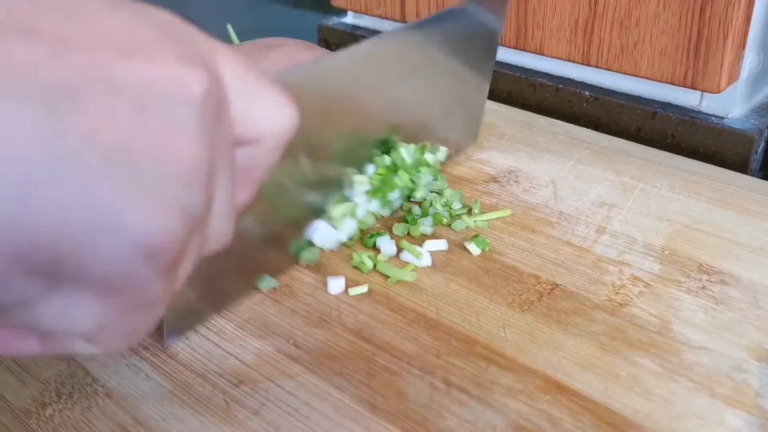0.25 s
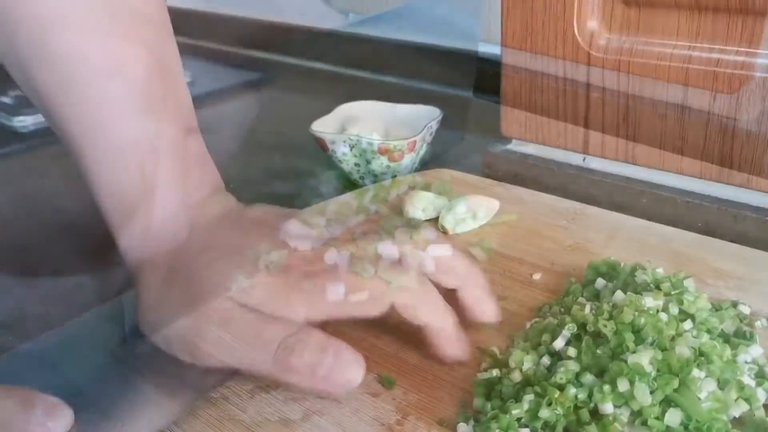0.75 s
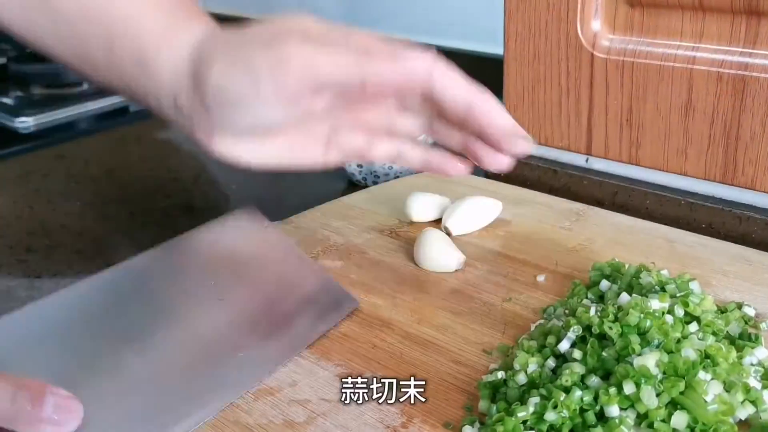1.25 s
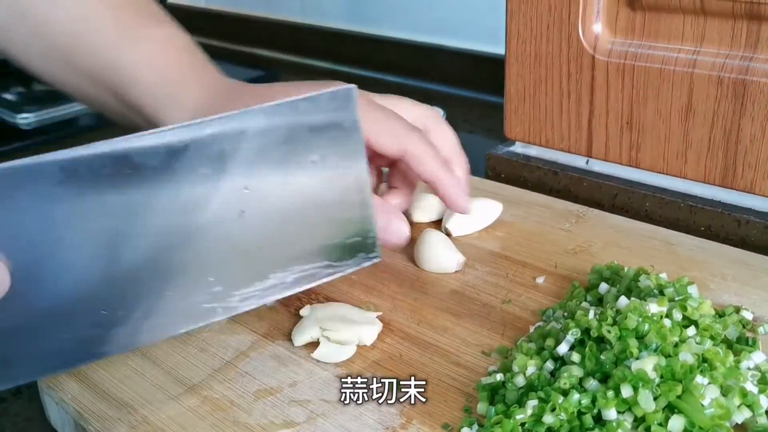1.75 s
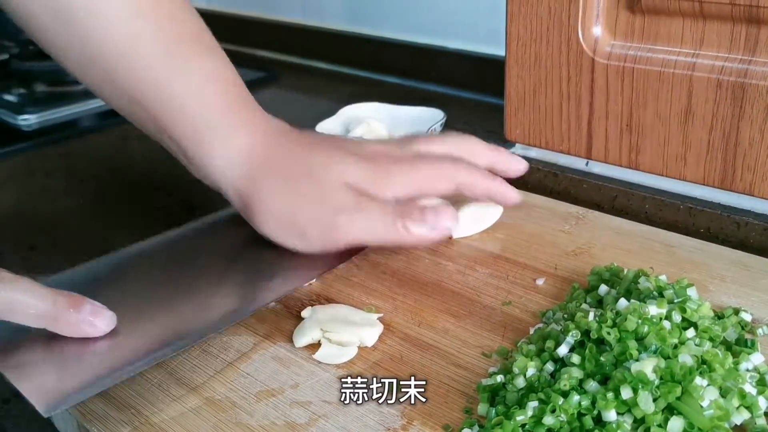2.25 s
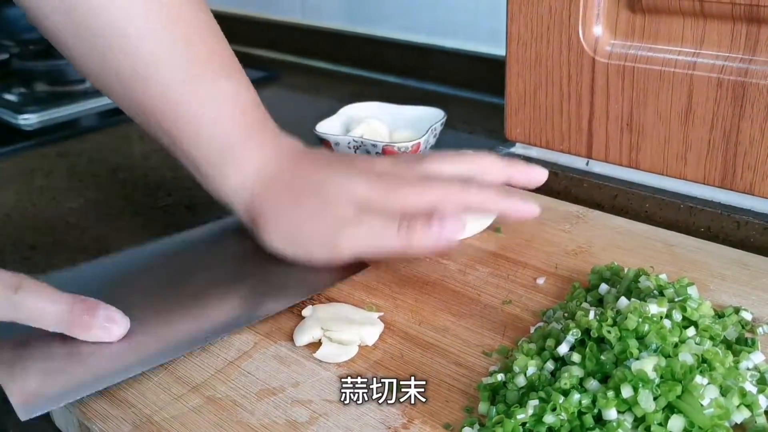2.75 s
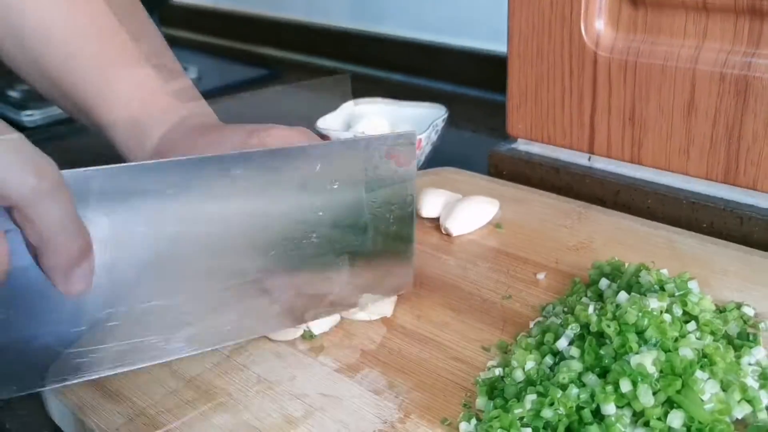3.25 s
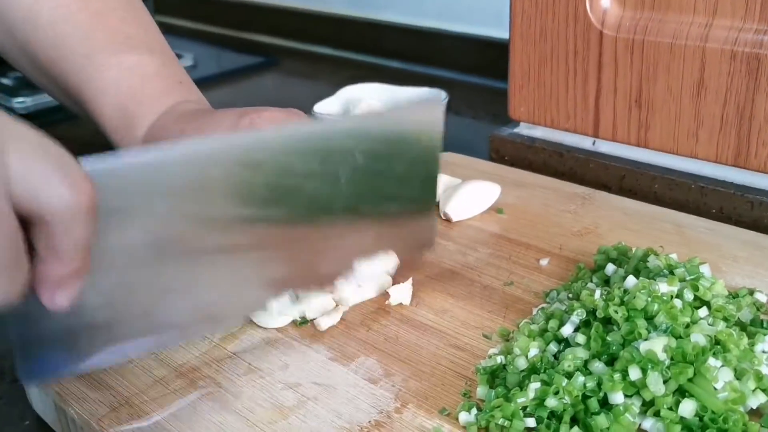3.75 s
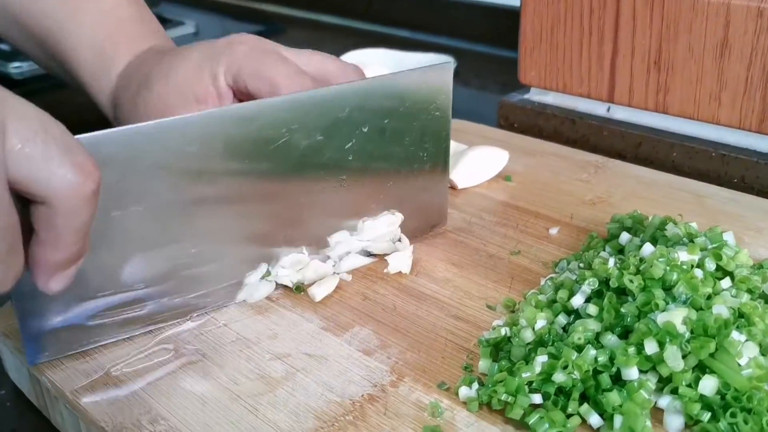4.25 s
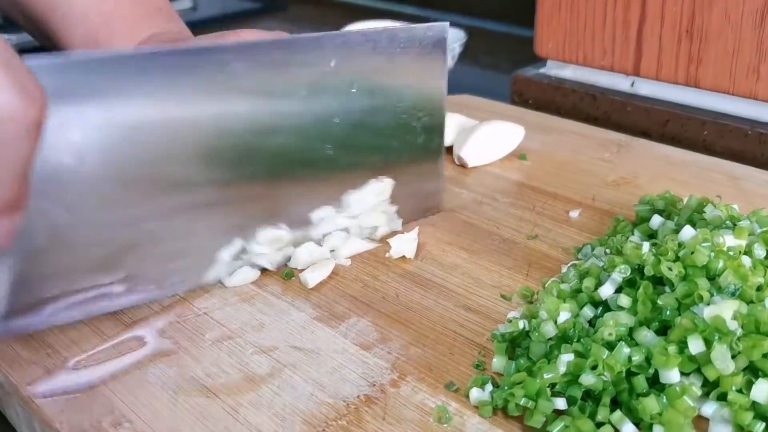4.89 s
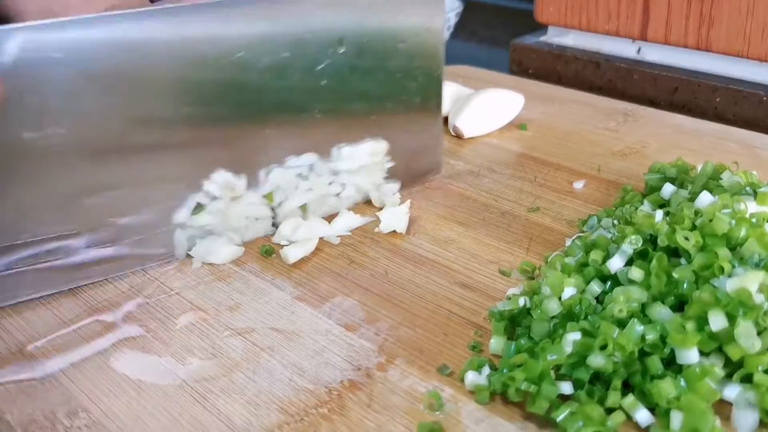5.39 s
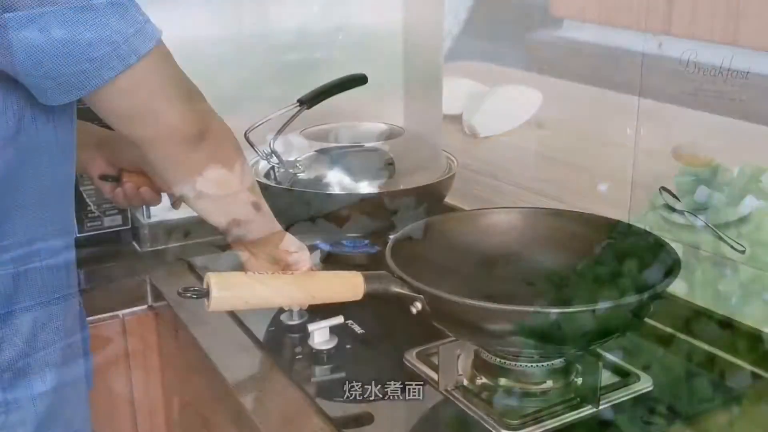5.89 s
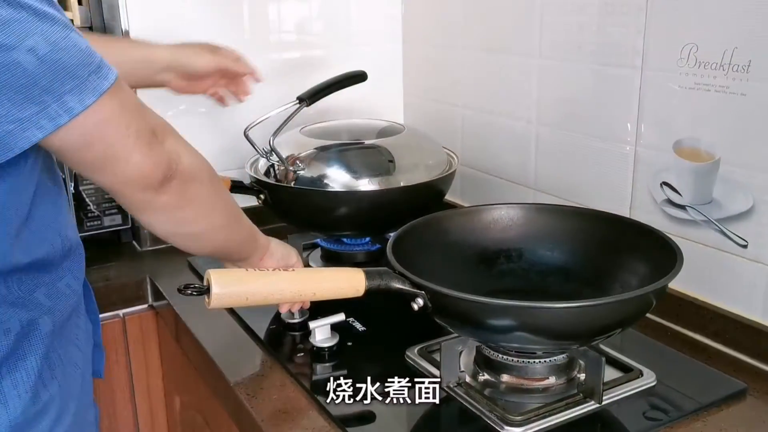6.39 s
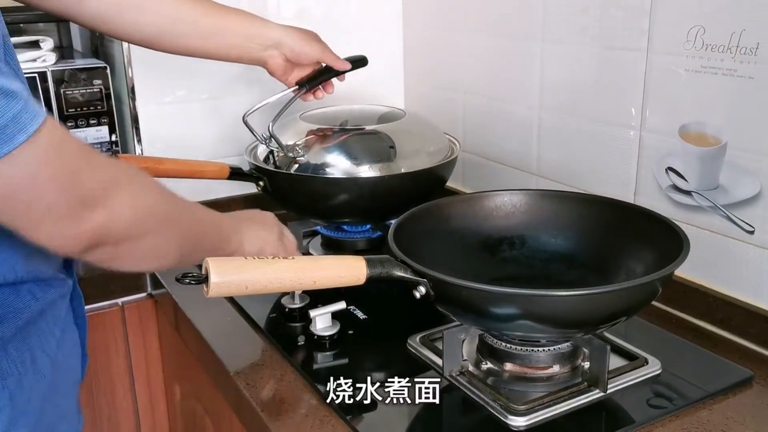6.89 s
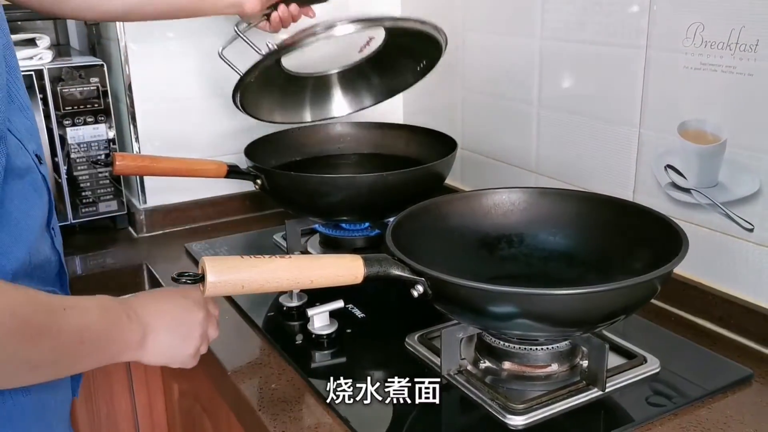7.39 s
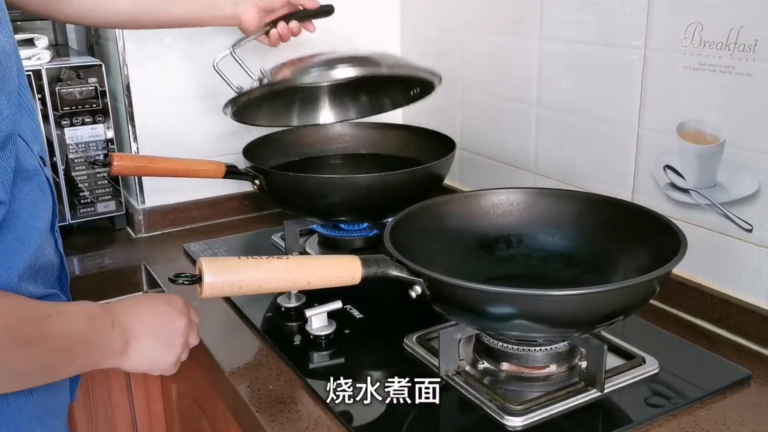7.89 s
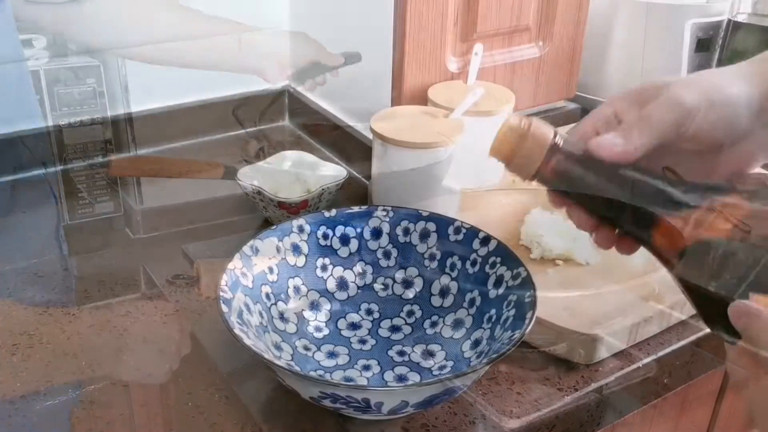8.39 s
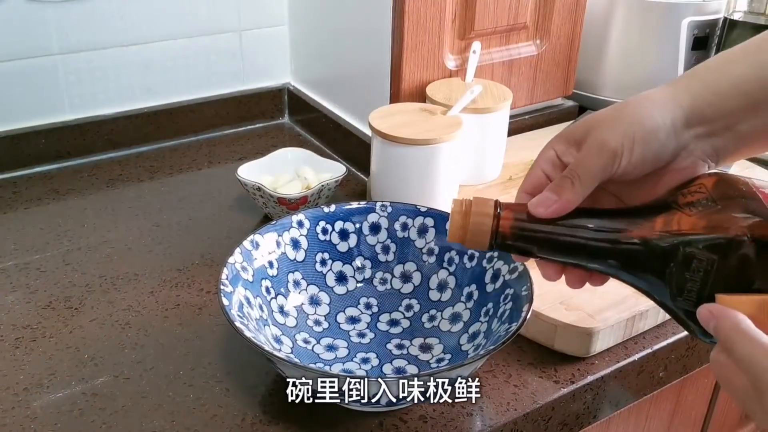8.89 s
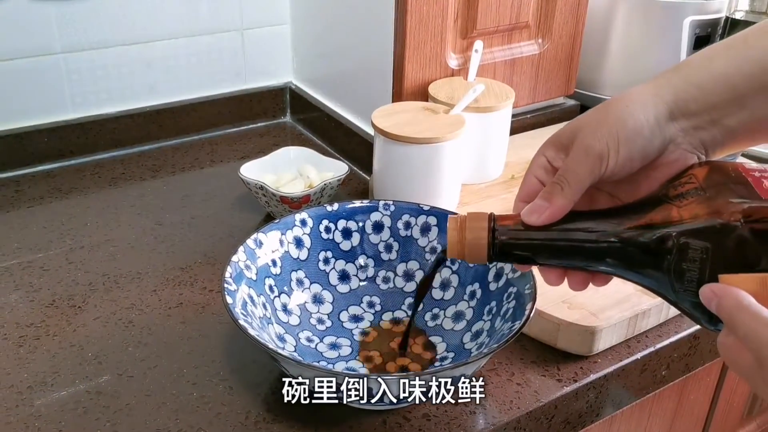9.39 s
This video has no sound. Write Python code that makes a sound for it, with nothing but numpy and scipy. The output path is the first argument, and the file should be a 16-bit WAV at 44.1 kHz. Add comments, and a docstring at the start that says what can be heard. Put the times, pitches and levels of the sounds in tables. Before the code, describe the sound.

In a small hard-surfaced kitchen, a nearby microphone catches four woody cleaver strokes, snapping cloves, a ringing blade and dull palm blows. Uneven, solid garlic chops follow, each with a little wet crunch. Bright electric sparks tick quickly, gas catches with a low breathy roar, and after light touches a metal lid lands with a loud ringing clash and thump. Everything stops suddenly to faint hiss.

```python
"""A cleaver cuts scallions on a thick wooden board, close to the microphone and to its right, in a small tiled kitchen.
Garlic is then crushed under the flat of the blade and chopped; an igniter ticks, a gas ring burns under a wok
and a steel lid is set down. The stove sound ends abruptly and a quiet room hiss is left.
Board, blade, lid and wok ring as sums of decaying modes; crunch, sparks and clash are showers of noise grains;
flame and room are coloured noise; a diffuse tail adds the tiles and cupboards."""
import sys
import numpy as np
from scipy import signal
from scipy.fft import rfft, irfft, next_fast_len
from scipy.io import wavfile

SR = 44100
rng = np.random.default_rng(int(sys.argv[2]) if len(sys.argv) > 2 else 0)


def generate_wav(signal):
    """Clip the signal to [-1, 1] and save it as 16-bit WAV at the path in sys.argv[1]."""
    frames = np.transpose(np.atleast_2d(signal))
    scaled = np.clip(frames, -1, 1) * 32767
    pcm = np.round(scaled).astype(np.int16)
    wavfile.write(sys.argv[1], SR, pcm)


N = 425124
TIME = np.arange(N) / SR

# Cleaver strokes. Each row: landing in seconds, relative knock level in dB, edge hardness in dB (lift from 2 kHz up),
# place on the board from 0 to 1, relative crunch level in dB, time to cut through in seconds.
STROKES = [(0.001, -16.5, -31, 0.8, -32.5, 0.051), (0.3326, -4.5, -2, 0.12, -27.5, 0.067),
           (0.662, -5.5, -3.5, 0, -28, 0.064), (1.0613, -10, -1, 0.1, -30, 0.0034),
           (3.53, 0.5, -6.5, 0.78, -33.5, 0.031), (3.8280, -0.5, -6.5, 1, -33.5, 0.043),
           (4.0645, -4.5, -12, 0.89, -30.5, 0.023), (4.2850, -2, 1, 0.79, -30, 0.021),
           (4.8124, -1.5, -3.5, 0.84, -34.5, 0.021), (5.0789, -3.5, -17, 0.76, -33.5, 0.05),
           (5.3284, -5.5, -5, 0.99, -32, 0.048), (5.561, -5.5, -2.5, 0.93, -36.5, 0.064),
           (5.7658, -3, -3, 0.3, -30.5, 0.037)]
# Stalks snap, cloves burst, skin scrapes or juice spits under the blade. Each row: start in seconds,
# relative level in dB, fade time in seconds, brightest frequency in Hz.
SMALL_BURSTS = [(0.281, -32.5, 0.0026, 1920), (0.929, -18, 0.0015, 3920), (0.9519, -21.5, 0.0064, 3700),
                (0.961, -22, 0.0013, 5870), (0.974, -21, 0.0011, 6430), (0.9965, -24.5, 0.001, 1930),
                (2.481, -42, 0.028, 4470), (2.676, -20.5, 0.0069, 1820), (2.697, -20.5, 0.0081, 2330),
                (2.71, -16, 0.0038, 6840), (4.092, -34, 0.003, 9000), (4.266, -31.5, 0.0031, 3520),
                (4.312, -28.5, 0.004, 7500), (5.540, -33.5, 0.0059, 2900), (5.726, -39, 0.01, 1807)]
# Spectrum of crushed plant cells, also used for the tick of the blade. Each row: frequency in Hz, relative dB per Hz.
CRUNCH_SPECTRUM = [(200, -17), (900, -5.5), (1600, 0), (3000, -5), (6000, 2.5), (11000, -2.5),
                   (16000, -14.5)]
# Spectrum of the sparks and of rubbing steel. Each row: frequency in Hz, relative dB per Hz.
SPARK_SPECTRUM = [(500, -14), (1500, -1.5), (2800, -2.5), (4000, -2), (6000, 2), (11000, 5.5),
                  (16000, -5.5)]


def from_db(db):
    """Decibels to gain."""
    return 10 ** (np.asarray(db) / 20)


def rms_one(x):
    """Scale to unit power."""
    return x / np.sqrt(np.mean(x ** 2) + 1e-20)


def at_hz(points, hz):
    """Read a table on a log-frequency axis."""
    freqs, values = np.transpose(points)
    return np.interp(np.log(np.maximum(hz, 1)), np.log(freqs), values)


def coloured(x, spectrum, tilt_db=0):
    """Give a noise its spectrum, tilted per octave above 800 Hz; unit power."""
    size = next_fast_len(x.shape[-1])
    hz = np.maximum(np.fft.rfftfreq(size, 1 / SR), 1)
    gain = from_db(at_hz(spectrum, hz) + tilt_db * np.log2(np.maximum(hz, 800)))
    return rms_one(irfft(rfft(x, size) * gain, size)[..., :x.shape[-1]])


def low_pass(x, hz):
    """Second-order low-pass."""
    return signal.sosfilt(signal.butter(2, min(hz, SR / 2 - 1), fs=SR, output="sos"), x)


def add(track, s, sound):
    """Mix a sound into a track at a given time."""
    start = int(round(s * SR))
    sound, start = sound[..., max(-start, 0):], max(start, 0)
    track[..., start:start + sound.shape[-1]] += sound[..., :track.shape[-1] - start]


def diffuse(size):
    """White stereo noise from all directions: alike in the bass, unrelated in the treble."""
    # Likeness of left and right. Each row: frequency in Hz, correlation from 0 to 1.
    likeness = [(100, 0.96), (250, 0.92), (500, 0.69), (1000, 0.2), (4000, 0.02)]
    padded = next_fast_len(size)
    mid, side = rfft(rng.standard_normal((2, padded)))
    alike = np.clip(at_hz(likeness, np.fft.rfftfreq(padded, 1 / SR)), -1, 1)
    stereo = np.sqrt(1 + alike) * mid + np.sqrt(1 - alike) * side * [[1], [-1]]
    return irfft(stereo, padded)[:, :size]


def kitchen(x, wet_db, pan_db, near_db=13.5, near_s=0.0022):
    """Direct sound plus dense reflections off tiles and cupboards; only the treble is shaded to one side."""
    # Decay of the room. Each row: frequency in Hz, t60 in seconds, relative strength of the reflections in dB.
    decay = [(80.5, 0.68, -2.5), (301, 0.27, -2.5), (424, 0.22, 2), (1420, 0.19, -1), (2950, 0.22, 0.5),
             (8660, 0.18, -2.5), (15000, 0.16, 3.5)]
    left_lag_s = 0.00007   # direct sound reaches the left side this much later
    t, size = TIME[:SR // 2], next_fast_len(len(x) + SR // 2)
    tail_hz, hz = np.fft.rfftfreq(len(t), 1 / SR), np.fft.rfftfreq(size, 1 / SR)
    noise = rfft(diffuse(len(t)))
    centres, t60s, dbs = np.transpose(decay)
    tail = 0
    for share, t60, db in zip(np.eye(len(decay)), t60s, dbs):
        band = at_hz(np.c_[centres, share], tail_hz)
        tail = tail + irfft(noise * band, len(t)) * from_db(db - 60 * t / t60)
    near = 1 + from_db(near_db) * np.exp(-t / near_s)   # worktop and splashback answer first and strongest
    onset = np.clip((t - .0008) / 0.00035, 0, 1)
    tail = rms_one(tail * near * onset) / np.sqrt(len(t))
    # left minus right in dB: a negative pan leans right
    shade = at_hz([(150, 0.0087), (900, pan_db)], hz) * np.array([[.5], [-.5]])
    direct = np.exp(-2j * np.pi * hz * left_lag_s * np.array([[1], [0]]))
    heard = rfft(x, size) * (direct + from_db(wet_db) * rfft(tail, size)) * from_db(shade)
    return irfft(heard, size)[:, :len(x)]


def grains(size, per_s, spread_db):
    """Tiny fractures of uneven size at random moments."""
    sizes = from_db(spread_db * np.minimum(rng.exponential(1, size), 4))
    return rng.standard_normal(size) * sizes * (rng.random(size) < per_s / SR)


def burst(spectrum, fade_s, tilt_db=0):
    """A sudden shower of fine clicks that dies away."""
    t = TIME[:SR // 2]
    return coloured(grains(len(t), per_s=14000, spread_db=0.5), spectrum, tilt_db) * np.exp(-t / fade_s)


def struck(modes, scatter_db, detune=0.0):
    """One blow rings every mode with a random strength and pitch shift; the deepest bass does not radiate."""
    hz, db, t60 = np.transpose(modes)[:, :, None]
    t = TIME[:SR // 2]
    strength, shift = rng.standard_normal((2, len(modes), 1))
    envelope = from_db(db + scatter_db * strength - 60 * t / t60)
    rings = envelope * np.sin(2 * np.pi * hz * (1 + detune * shift) * t)
    return signal.sosfilt(signal.butter(2, 65, "high", fs=SR, output="sos"), rings.sum(axis=0))


def board_blow(place, hardness_db, dense_db=-23.0, dense_s=0.016):
    """The place weights the modes, the pressing blade detunes them, a hard contact lifts the high ones."""
    # Modes of board and counter. Each row: frequency in Hz, relative dB struck at place 0,
    # relative dB struck at place 1, t60 in seconds.
    board_modes = [(86.7, -46, -40.5, 0.49), (98.4, -28.5, -34, 0.23), (127, -39, -31.5, 0.14),
                   (178.6, -52, -32, 0.12), (222.3, -35.5, -34, 0.12), (268.6, -40, -33, 0.071),
                   (328, -23, -33, 0.05), (419, -19.5, -24.5, 0.07), (492, -63, -28, 0.035),
                   (663, -13.5, -44, 0.043), (763, -45, -33, 0.057), (925, -55, -27.5, 0.14),
                   (996, -25, -47, 0.067), (1195, -11.5, -14, 0.014), (1420, -42, -13.5, 0.022),
                   (1520, -45, -15, 0.02), (1696, -48, -29, 0.057), (2050, -29, -27, 0.038),
                   (2373, -25, -26, 0.031)]
    # Many overlapping modes between them. Each row: frequency in Hz, relative dB per Hz.
    wood_spectrum = [(50, -42), (270, -2.5), (420, -6.5), (600, -6), (1100, -5), (1500, -9.5), (1900, -30),
                     (2450, -8.5), (3100, -45), (7000, -26)]
    modes = []
    for hz, db_0, db_1, t60 in board_modes:
        lift_db = hardness_db * np.clip(np.log2(hz / 1000), 0, 1)
        modes.append((hz, db_0 + place * (db_1 - db_0) + lift_db, t60))
    clear = struck(modes, scatter_db=2, detune=.03)
    return clear + from_db(dense_db) * burst(wood_spectrum, dense_s, hardness_db / 3)


def small_burst(hz, fade_s, build_s=0.0011, below_db=-16, above_db=-25):
    """One snap, scrape or spit, brightest around a given pitch; it takes a moment to build."""
    spectrum = [(hz / 16, 2 * below_db), (hz / 2, below_db / 2), (hz, 0), (2 * hz, above_db / 3), (8 * hz, above_db)]
    return (1 - np.exp(-TIME[:SR // 2] / build_s)) * burst(spectrum, fade_s)


def room_tone(until_stop, first_db=-58, last_db=-54):
    """One steady hiss until the stove sound stops, another after it, over a rumble that swells with each stroke."""
    # Spectra of the first hiss, the last hiss and the counter's rumble. Each row: frequency in Hz, relative dB per Hz.
    first_spectrum = [(71, -22), (120, -6), (204, -19), (251, -2.5), (301, -9.5), (988, -13), (1290, -18),
                      (1650, -19.5), (2750, -18), (3110, -30.5), (3380, -24), (4980, -19), (16000, -39)]
    last_spectrum = [(59, -39), (100, -54), (185, -12.5), (234, -34), (295, -12.5), (406, -22.5),
                     (608, -25), (676, -24), (1100, -24), (1760, -35.5), (2080, -25), (2690, -26),
                     (3700, -33.5), (6700, -33), (16000, -50)]
    rumble_spectrum = [(15, -2), (33, -5), (60, -6.5), (92, -3), (130, -11), (300, -19.5), (1500, -103)]
    rumble_db, stroke_rumble_db, stroke_rumble_s = -53.5, -43.5, 0.022
    first_hiss = from_db(first_db) * coloured(diffuse(N), first_spectrum)
    last_hiss = from_db(last_db) * coloured(diffuse(N), last_spectrum)
    swells = sum(np.exp(-((TIME - row[0]) / stroke_rumble_s) ** 2) for row in STROKES)
    rumble_level = from_db(rumble_db) + from_db(stroke_rumble_db) * swells
    rumble = rumble_level * coloured(diffuse(N), rumble_spectrum)
    return until_stop * first_hiss + (1 - until_stop) * last_hiss + rumble


def flame(flutter_db=1.6, flutter_hz=14):
    """The gas catches with a puff and settles to a steady, softly fluttering roar."""
    # Spectrum of the burner. Each row: frequency in Hz, relative dB per Hz.
    flame_spectrum = [(24, -73), (40, -15), (58, -21), (185, -1), (243, -11), (363, -7.5), (422, -19),
                      (646, -12), (751, -17), (942, -13.5), (1520, -22), (1810, -19.5), (2050, -24.5),
                      (6820, -32), (16000, -45.5)]
    light_s, catch_s, puff_fade_s = 6.01, 0.03, 0.083
    puff_db, roar_db = -43, -46
    caught = np.clip((TIME - light_s) / catch_s, 0, 1)
    puff = from_db(puff_db) * np.exp(-np.maximum(TIME - light_s - catch_s, 0) / puff_fade_s)
    flutter = from_db(flutter_db * rms_one(low_pass(rng.standard_normal(N), flutter_hz)))
    return caught * (from_db(roar_db) + puff) * flutter * coloured(diffuse(N), flame_spectrum)


def igniter(gain_db=-4.0, snap_s=0.0029, uneven_db=1, sizzle_db=-20, sizzle_s=0.028, count=15):
    """Each spark is a bright snap with a brief sizzle: two loud ones, then a quieter even train that slowly grows."""
    # The first, loud sparks. Each row: start in seconds, relative level in dB.
    loud_sparks = [(5.854, -26.5), (5.909, -23.5)]
    ticking_s, period_s = 5.976, 0.0588
    tick_db, rise_db_per_s = -38.5, 5.5
    out, t = np.zeros(N), TIME[:SR // 6]
    train = []
    for later_s in period_s * np.arange(count):
        level_db = tick_db + rise_db_per_s * later_s + uneven_db * rng.standard_normal()
        train.append((ticking_s + later_s, level_db))
    for s, db in loud_sparks + train:
        sizzle = coloured(grains(len(t), per_s=1200, spread_db=3.5), SPARK_SPECTRUM) * np.exp(-t / sizzle_s)
        add(out, s, from_db(db + gain_db) * burst(SPARK_SPECTRUM, snap_s))
        add(out, s, from_db(db + sizzle_db) * sizzle)
    return out


def lid(thud_db=-26, thud_s=0.047):
    """The rim clashes on the wok, the lid rings and the wok thumps on its stand."""
    # The lid meets the wok. Each row: start in seconds, relative clash level in dB, clash fade time in seconds,
    # relative ring level in dB, relative thump level in dB.
    lid_hits = [(7.04, -71, 0.018, -28.5, -17), (7.245, -63, 0.016, -42, -17),
                (8.156, -49.5, 0.012, -31, -32), (8.185, -59.5, 0.045, -23, -37),
                (8.429, -38.5, 0.03, -42, -17), (8.5301, -33, 0.052, -6.5, -3.5),
                (8.607, -29.5, 0.017, -23, -12), (8.619, -42, 0.032, -12.5, -1.5)]
    # Modes of the lid, then of the wok on its stand. Each row: frequency in Hz, relative dB, t60 in seconds.
    lid_modes = [(808, -20, 0.21), (1110, -40, .15), (1685, -32, 0.21), (1930, -35, 0.26),
                 (2660, -35, 0.18), (2870, -51, 0.091), (4880, -27, 0.072), (7849, -49, .14)]
    wok_modes = [(111, -48, 0.066), (155, -30, 0.078), (178.5, -21, 0.13), (243, -27, 0.077)]
    # Spectra of the clash and of the wok's many low modes at once. Each row: frequency in Hz, relative dB per Hz.
    clash_spectrum = [(100, 10.5), (400, 0), (1500, 3.5), (2800, 1), (4500, 2), (7500, 2), (11000, -2),
                      (16000, -19)]
    thud_spectrum = [(30, -11), (90, -36), (140, -11), (200, 8), (300, -8), (450, -29), (1500, -41)]
    out = np.zeros((2, N))
    for s, clash_db, fade_s, ring_db, thump_db in lid_hits:
        thump = struck(wok_modes, scatter_db=1.5) + from_db(thud_db) * burst(thud_spectrum, thud_s)
        clash = burst(clash_spectrum, fade_s)
        ring = struck(lid_modes, scatter_db=1)
        add(out, s, from_db(clash_db) * kitchen(clash, wet_db=9.5, pan_db=-3.5))
        add(out, s, from_db(ring_db) * kitchen(ring, wet_db=-3.0, pan_db=-2.5))
        add(out, s, from_db(thump_db) * kitchen(thump, wet_db=0.0, pan_db=2.0))
    return out


def blade(tick_s=0.0045, sharpness=45, judder_db=1.5):
    """Steel ticks and rings when knocked; uneven sliding friction makes it sing at a pitch given for each slide."""
    # The blade touches the board or is knocked. Each row: start in seconds, tick level in dB, relative ring level in dB.
    clinks = [(0.09, -41, -23.5), (0.431, -33.5, -18), (1.117, -39.5, -33), (1.135, -35.5, -11.5),
              (1.1737, -35.5, -36), (1.3002, -43, -37), (1.3843, -31.5, -1), (2.939, -53, -24),
              (3.018, -44.5, -19), (4.239, -42.5, -35), (5.266, -38.5, -22), (5.689, -50.5, -31.5)]
    # Modes of the knocked blade. Each row: frequency in Hz, relative dB, t60 in seconds.
    blade_modes = [(1647, -39, 0.15), (2000, -46.5, .18), (2272, -37, 0.055), (2467, -47, 0.21),
                   (3031, -45.5, 0.27), (4060, -44, 0.18), (4960, -46, .17), (5440, -39.5, 0.09),
                   (5900, -51, 0.11), (6700, -38, 0.097), (7500, -42, 0.094), (8200, -47, 0.074),
                   (10800, -61, .045), (13300, -60, .045)]
    # The blade slides over board and garlic. Each row: start in seconds, length in seconds, rubbing level in dB,
    # singing frequency in Hz, singing level in dB.
    slides = [(1.515, .17, -53.5, 5620, -60), (1.668, 0.16, -82, 1658, -65), (2.035, .11, -60, 7400, -66),
              (2.52, 0.094, -63.5, 7060, -66), (2.87, 0.14, -65, 5850, -71), (3.12, 0.19, -80, 3090, -73)]
    slide_edge_s = 0.052   # a slide gathers speed and stops within this time
    out, ring = np.zeros(N), struck(blade_modes, scatter_db=1)
    for s, tick_db, ring_db in clinks:
        add(out, s, from_db(ring_db) * ring + from_db(tick_db) * burst(CRUNCH_SPECTRUM, tick_s))
    judder = from_db(judder_db * rms_one(low_pass(rng.standard_normal(N), 36)))
    friction = judder * coloured(grains(N, per_s=3000, spread_db=4.0), SPARK_SPECTRUM)
    for s, length, rub_db, hz, sing_db in slides:
        singing = rms_one(signal.lfilter(*signal.iirpeak(hz, sharpness, fs=SR), friction))
        speed = np.clip(np.minimum(TIME - s, s + length - TIME) / slide_edge_s, 0, 1)
        out += speed * (from_db(sing_db) * singing + from_db(rub_db) * friction)
    return out


def palm(gain_db=-5.0, weight_db=-3.5):
    """A soft blow wakes mainly the low modes of the board; the weight of the arm shakes the counter."""
    # The palm lands on the flat blade, or the edge catches on a clove. Each row: start in seconds,
    # relative level in dB, softness as a cut-off in Hz.
    palm_blows = [(0.09, -17.5, 387), (0.434, -17, 740), (0.931, -14, 690), (0.957, -6, 393),
                  (0.997, -10.5, 486), (1.385, -21.5, 774), (2.405, -0.5, 229), (2.485, -13.5, 620),
                  (2.677, -1.5, 290), (2.699, 1.5, 250), (2.938, -17, 736), (3.5245, -11.5, 800),
                  (5.073, -14, 800)]
    # Modes of the counter under the arm. Each row: frequency in Hz, relative dB, t60 in seconds.
    counter_modes = [(89.3, -28, 0.55), (104, -25, 0.28), (174.8, -29, 0.24)]
    out = np.zeros((2, N))
    for s, db, soft_hz in palm_blows:
        wood = low_pass(board_blow(0.86, 0, dense_db=-18.5, dense_s=0.018), soft_hz)
        add(out, s, from_db(db + weight_db) * struck(counter_modes, scatter_db=0.5))
        add(out, s, kitchen(from_db(db + gain_db) * wood, wet_db=4, pan_db=-6.0))
    return out


def cracks(gain_db=-2.5, skin_tilt_db=-4.5):
    """Short noise bursts for snaps, scrapes and spits; the dry skin of a crushed clove crackles on."""
    # Skin crackles ever more faintly. Each row: start in seconds, level in dB before the fade, fade time in seconds.
    crushes = [(0.984, -40, 0.065), (2.72, -42, 0.05)]
    out, t = np.zeros(N), TIME[:SR // 2]
    for s, db, fade_s, hz in SMALL_BURSTS:
        add(out, s, from_db(db + gain_db) * small_burst(hz, fade_s))
    for s, db, fade_s in crushes:
        crackle = coloured(grains(len(t), per_s=1500, spread_db=7.5), CRUNCH_SPECTRUM, skin_tilt_db)
        add(out, s, from_db(db) * np.exp(-t / fade_s) * crackle)
    return out


def pops(gain_db=3.5, cycles=1.44, slow_s=0.0033):
    """Each small burst starts with a sharp pop that rings for a few cycles; slow ones pop less."""
    out, t = np.zeros(N), TIME[:SR // 20]
    for s, db, fade_s, hz in SMALL_BURSTS:
        level = from_db(db + gain_db) * 2 / (1 + fade_s / slow_s)
        add(out, s, level * np.sin(2 * np.pi * hz * t) * np.exp(-hz * t / cycles))
    return out


def crunches(swell_db=21, bend=1.52, fade_s=0.0078, gain_db=-4.0, spit_s=0.0031):
    """Cells burst ever louder as the edge sinks in, until the board stops it; juice spits just after."""
    spit_db, spit_delay_s, spit_hz = -36.5, 0.023, 10600
    out, t = np.zeros(N), TIME[:SR // 3] - 1 / 6   # time 0 is when the edge lands
    for s, _, _, _, db, cut_s in STROKES:
        rise = from_db(-swell_db * (np.maximum(-t, 0) / cut_s) ** bend)
        fall = np.exp(-np.maximum(t, 0) / fade_s)
        cells = coloured(grains(len(t), per_s=9000, spread_db=4.5), CRUNCH_SPECTRUM)
        add(out, s + t[0], from_db(db + gain_db) * rise * fall * cells)
        add(out, s + spit_delay_s, from_db(spit_db) * small_burst(spit_hz, spit_s))
    return out


def knocks(gain_db=0.5, contact_hz=2900):
    """The edge hits the board and nearby surfaces answer; arm and blade have moved, so reflections vary by blow."""
    # Worktop, splashback and cupboard answer first. Each row: delay at the left in seconds,
    # delay at the right in seconds, level against the blow in dB.
    echoes = [(.0026, 0.0035, -13.5), (.0051, 0.0034, -6), (.0079, .008, -7.5)]
    out = np.zeros((2, N))
    for s, db, hardness_db, place, _, _ in STROKES:
        blow = -from_db(db + gain_db) * low_pass(board_blow(place, hardness_db), contact_hz)
        add(out, s, kitchen(blow, wet_db=0.5, pan_db=-5.5))
        for left_s, right_s, echo_db in echoes:
            add(out[0], s + left_s, from_db(echo_db) * blow)
            add(out[1], s + right_s, from_db(echo_db) * blow)
    return out


def scene():
    """The board lies close and to the right; the stove stands further off, its flame a touch to the left."""
    # Chopping breaks off after the scallions and returns for the garlic. Each row: time in seconds, gain.
    chopping_gain = [(1.076, 1), (1.080, 0), (3.0, 0), (3.2, 1)]
    stop_s = 8.652   # the stove sound ends here
    until_stop = np.clip((stop_s - TIME) / 0.0063, 0, 1)
    chopping_on = np.interp(TIME, *np.transpose(chopping_gain))
    # thin bright sounds fill the room more than the board does
    chops = knocks() + kitchen(crunches(), wet_db=6, pan_db=-3.5)
    handling = palm() + kitchen(cracks() + blade(), wet_db=6, pan_db=-4.5)
    handling += kitchen(pops(), wet_db=2.5, pan_db=-11.5)
    stove = kitchen(igniter(), wet_db=9.0, pan_db=-3.0) + lid() + flame() * from_db([[.6], [-.6]])
    return chopping_on * chops + handling + until_stop * stove + room_tone(until_stop)


def record(dry):
    """The top is cut steeply above 16.2 kHz."""
    return signal.sosfilt(signal.ellip(10, .1, 80, 16200, fs=SR, output="sos"), dry)


dry = scene()
out = record(dry)
generate_wav(out)
```